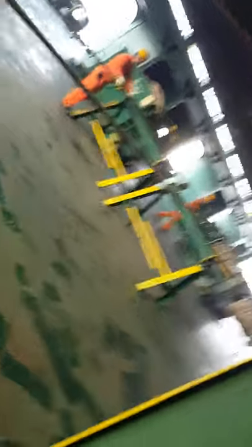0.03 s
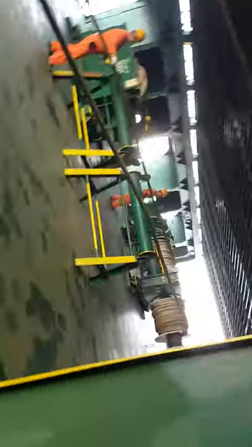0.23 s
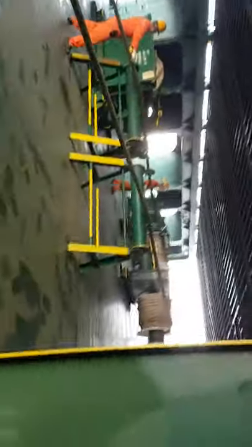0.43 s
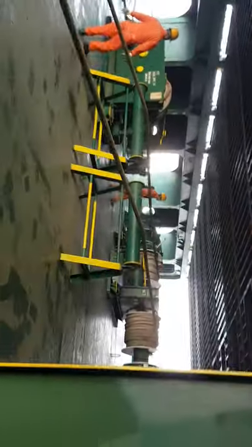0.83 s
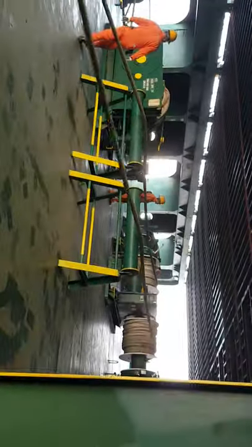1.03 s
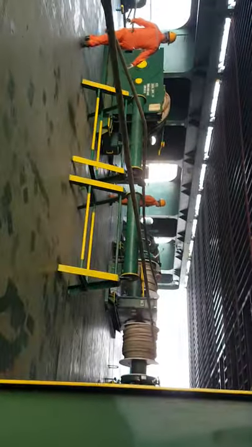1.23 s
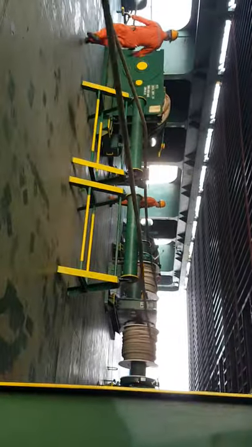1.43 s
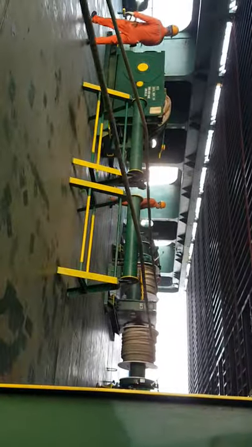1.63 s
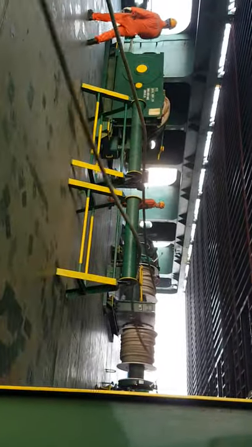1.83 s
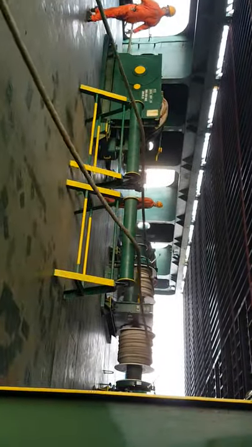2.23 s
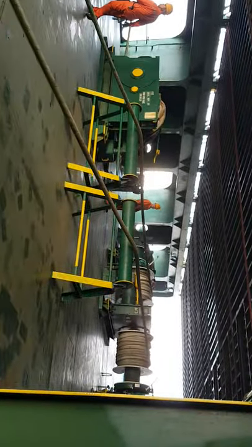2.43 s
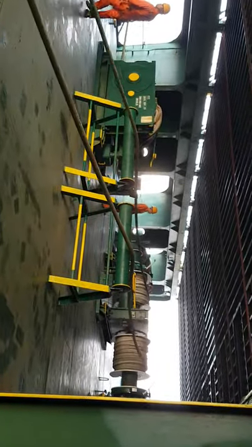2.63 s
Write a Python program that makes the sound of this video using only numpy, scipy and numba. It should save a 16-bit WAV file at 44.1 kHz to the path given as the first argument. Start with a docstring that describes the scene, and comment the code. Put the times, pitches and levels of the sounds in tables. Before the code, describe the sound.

Winch machinery drones with a wavering whine on an enclosed ship deck, picked up by a phone. Near the end a loud metallic bang distorts the microphone, followed by softer knocks and echoing, ringing steel.

```python
"""A mooring winch is running on the covered steel deck of a ship. Over a deep rumble of wind or handling the
motor hums, a gear whine swells and fades, and machinery noise washes. A few faint ticks come early. Just after
two seconds one heavy bang sets the steel plating ringing and booms round the deck. It overloads the phone,
whose gain control ducks the drone and holds it down while softer knocks set the plating ringing again."""
import sys
import numpy as np
from scipy import signal
from scipy.fft import rfft, irfft, next_fast_len
from scipy.io import wavfile
from scipy.ndimage import uniform_filter1d
from numba import njit

SR = 44100
rng = np.random.default_rng(int(sys.argv[2]) if len(sys.argv) > 2 else 0)


def int16_out(signal):
    """Quantize to a 16-bit WAV file."""
    q = np.round(np.clip(np.atleast_2d(signal).T, -1, 1) * 32767)
    wavfile.write(sys.argv[1], SR, q.astype(np.int16))


N = 123479


def undb(db):
    """Decibels to gain."""
    return 10 ** (np.asarray(db) / 20)


def pan(db):
    """Stereo gains for a left-minus-right level difference."""
    return undb(np.array([[db], [-db]]) / 2)


def at(table, hz, column=1):
    """One column of a table, read on a log-frequency axis."""
    rows = np.array(table, float)
    return np.interp(np.log(hz), np.log(rows[:, 0]), rows[:, column])


def fader(table, t):
    """Gain riding through breakpoints of t/s, level/dB."""
    return undb(np.interp(t, *np.array(table).T))


def wander(per_s):
    """Smooth random modulation with a spread near 1."""
    hold = int(SR / per_s)
    steps = np.repeat(rng.standard_normal(256)[:N // hold + 2], hold)
    return 1.3 * uniform_filter1d(uniform_filter1d(steps, hold), hold)[:N]


# stereo image of the reverberant deck: f/Hz, left-right correlation
LIKENESS = [(40, 0.95), (170, 1), (300, 0.89), (430, 0.68), (600, 0.86), (780, -0.16), (1000, 0.12),
            (1500, -0.28), (2100, -0.33), (2700, 0.29), (3500, -0.014)]
def noise_bands(spectrum):
    """Diffuse stereo noise as third-octave (Hz, band) pairs, together near rms 1."""
    size = next_fast_len(N)
    f = np.maximum(np.fft.rfftfreq(size, 1 / SR), 1)
    mid, side = rfft(rng.standard_normal((2, size)))
    like = np.clip(at(LIKENESS, f), -.99, .99)
    stereo = mid * np.sqrt((1 + like) / 2) + np.array([[1], [-1]]) * side * np.sqrt((1 - like) / 2)
    eq = undb(at(spectrum, f))
    stereo *= eq / np.sqrt(np.mean(eq ** 2))
    for hz in 20 * 2 ** (np.arange(30) / 3):
        window = np.maximum(1 - 3 * abs(np.log2(f / hz)), 0)
        yield hz, irfft(stereo * window, size)[:, :N]


def tones(partials, clock, waver_db=2, per_s=9):
    """Partials locked to one clock; echoes make each waver, the higher ones differently per side."""
    out = 0
    for hz, db in partials:
        like = np.clip(at(LIKENESS, hz), 0, 1)
        shared = np.sqrt(like) * wander(per_s)
        apart = np.sqrt(1 - like) * np.array([wander(per_s), wander(per_s)])
        gain = np.sqrt(2) * undb(db + waver_db * (shared + apart))
        phase = 2 * np.pi * (hz * clock + rng.random()) + waver_db * np.log(10) / 20 * wander(per_s)
        width = np.arccos(like) * wander(2.05) * np.array([[-1], [1]]) / 2
        out += gain * np.sin(phase + width)
    return out


# fader ride of the deep rumble: t/s, level/dB
RUMBLE_RIDE = [(0, -29.5), (.3, -35.5), (.75, -33.5), (.9, -39), (1.1, -36), (1.45, -44), (1.68, -32.5),
               (2.0, -29), (2.3, -44.5), (2.8, -43.5)]
RUMBLE_HZ = 33
def rumble(t, clock):
    """Deep, uneven rumble of wind or handling on the phone, played as one wavering sub tone."""
    return pan(-1.5) * fader(RUMBLE_RIDE, t) * tones([(RUMBLE_HZ, 0)], clock, waver_db=1.5)


# hum partials of motor and hull: f/Hz, level/dB
HUM_PARTIALS = [(41, -46), (100, -47), (120, -43), (140, -36.5), (160, -44.5), (180, -37), (215.8, -32.5),
                (270, -39), (279.8, -32), (350, -41.5), (559.8, -39), (629.7, -39)]
# fader ride of the strongest low hum: t/s, level/dB
DRONE_RIDE = [(0, -44), (.2, -42), (.38, -28), (.5, -40), (.64, -28.5), (.88, -35), (1.15, -28),
              (1.27, -34), (1.42, -29), (1.72, -45), (2.0, -31), (2.8, -31.5)]
DRONE_HZ = 80.3
def motor_hum(t, shaft):
    """The low bed: motor and hull hum over a heaving drone."""
    hum = undb(-.5) * tones(HUM_PARTIALS, shaft, waver_db=2.8)
    drone = fader(DRONE_RIDE, t) * tones([(DRONE_HZ, 0)], shaft, waver_db=1.5)
    return pan(-1.5) * (hum + drone)


# lower gear tones that come and go: f/Hz, [t/s, level/dB]
GEAR_SWELLS = [(704.5, [(0, -39.5), (.2, -37.5), (.4, -59), (.6, -45), (1.0, -50), (1.2, -43), (1.4, -41),
               (2.0, -45)]), (775.4, [(0, -50), (.5, -40.5), (1.1, -50), (1.5, -38.5), (1.75, -36),
               (2.0, -42)]), (898.5, [(0, -50), (.4, -56), (.65, -42.5), (1.1, -40), (1.7, -50),
               (2.0, -45)])]
# close, beating partials of the singing mesh: f/Hz, relative level/dB
SING_PARTIALS = [(2461, -4), (2508, -0.5), (2533, -2.5)]
# fader ride of that singing: t/s, level/dB
SING_RIDE = [(0, -50), (.32, -44), (.7, -55), (1.15, -50.5), (1.56, -45), (1.7, -46), (1.88, -47),
             (2.8, -49.5)]
# midrange partials of the gearbox: f/Hz, level/dB
GEAR_MIDS = [(737.5, -49.5), (834.4, -55), (931.3, -51), (1044, -49), (1136.4, -41.5), (1254.6, -47),
             (1405, -55.5), (1540, -60), (1766, -53.5)]
# its high partials: f/Hz, level/dB
GEAR_HIGHS = [(2121, -53), (2389, -50.5), (2654, -56.5), (2794, -57), (2929, -62), (3068, -56), (3133, -57),
              (3354, -57), (3677, -66), (3768, -68), (4156, -71), (4366, -65), (4484, -65.5)]
def gearbox(t, shaft):
    """Meshing gears sing a cluster of wavering partials, right of centre."""
    swells = sum(fader(ride, t) * tones([(hz, 0)], shaft) for hz, ride in GEAR_SWELLS)
    sing = fader(SING_RIDE, t) * tones(SING_PARTIALS, shaft)
    mids = undb(.5) * (tones(GEAR_MIDS, shaft) + swells)
    return pan(-5.5) * mids + pan(-8.5) * sing + pan(-9.5) * tones(GEAR_HIGHS, shaft)


# fader ride of the loudest gear tone: t/s, level/dB
WHINE_RIDE = [(0, -35.5), (.15, -33.5), (.28, -41.5), (.43, -30.5), (.55, -26.5), (.78, -36.5),
              (.89, -31.5), (1.21, -41.5), (1.35, -31), (1.48, -28), (1.63, -34), (1.79, -32.5),
              (1.99, -35), (2.05, -28), (2.8, -27)]
# fader ride of the upper gear tone: t/s, level/dB
UPPER_RIDE = [(0, -57), (.35, -52), (.6, -41), (.76, -54.5), (.89, -44), (1.02, -51.5), (1.15, -49),
              (1.7, -54), (1.83, -42.5), (2.0, -54), (2.8, -56.5)]
WHINE_HZ, UPPER_HZ, LEFT_LEAD_S = 1016.3, 1883.5, .00023
def gear_whine(t, shaft):
    """Two pure gear tones follow the shaft, swelling and fading."""
    main = fader(WHINE_RIDE, t) * np.sin(2 * np.pi * WHINE_HZ * np.array([shaft + LEFT_LEAD_S, shaft]))
    upper = fader(UPPER_RIDE, t) * np.sin(2 * np.pi * UPPER_HZ * shaft)
    return np.sqrt(2) * (pan(-3.5) * main + pan(-10) * upper)


# tone colour of the machinery noise: f/Hz, relative level/dB per Hz
WASH_EQ = [(15, -26.5), (32, -10.5), (52, -6), (80, 0.5), (130, 2.5), (260, -2.5), (420, -8.5), (650, -9),
           (900, -11), (1500, -17.5), (2500, -17), (3300, -23.5), (4500, -30.5), (5200, -36.5),
           (7000, -43.5), (8300, -43.5), (9400, -51), (12000, -49), (15500, -56.5)]
# panning of diffuse sound on the deck: f/Hz, left minus right/dB
DECK_PAN = [(40, -1.5), (200, 0.1), (430, -3.5), (550, 2), (800, -1.5), (1300, -4.5), (2200, -8),
            (3000, -4.5), (4000, -2), (12000, 1)]
WASH_DB, FLICKER_DB, SMOOTHER_ABOVE_HZ = -25, 1.3, 3600
THROB_HZ, THROB_DEPTH, THROB_BELOW_HZ = 20, .14, 600
def machinery_wash(t):
    """Fans and machinery: bands swell together, flicker alone; the lows throb once per shaft turn."""
    level_db = WASH_DB + .3 * wander(5.5)
    angle = 2 * np.pi * THROB_HZ * t
    throb = 1 + THROB_DEPTH * (np.sin(angle) + np.sin(2 * angle))
    out = 0
    for hz, band in noise_bands(WASH_EQ):
        flicker_db = FLICKER_DB * min(SMOOTHER_ABOVE_HZ / hz, 1) * wander(16)
        gain = undb(level_db + flicker_db) * (throb if hz < THROB_BELOW_HZ else 1)
        out += pan(at(DECK_PAN, hz)) * gain * band
    return out


# faint tick cues: t/s, level/dB
TICK_CUES = [(.19, -40), (.198, -43), (.257, -39)]
TICK_DECAY_S, TICK_ABOVE_HZ = .0006, 7000
def ticks(t):
    """Faint, very short ticks of high treble noise."""
    bursts = sum(undb(db) * (t >= s) * np.exp(-abs(t - s) / TICK_DECAY_S) for s, db in TICK_CUES)
    highpass = signal.butter(2, TICK_ABOVE_HZ, "high", fs=SR, output="sos")
    return signal.sosfilt(highpass, bursts * rng.standard_normal((2, N)))


BANG_S, BANG_ATTACK_S, LEFT_LAG_S = 2.0767, .0025, .0001
def attack(age):
    """The fast front edge of a blow."""
    return 1 - np.exp(-age / BANG_ATTACK_S)


# modes of the steel plating: f/Hz, starting level/dB, t60/s
PLATE_MODES = [(125.1, -14, 4.4), (171.3, -1, 1.15), (207.7, -6, 1.6), (281.8, -4.5, 1.9),
               (304.6, 12.5, 0.12), (336.2, -4.5, 1.4), (411.7, -6.5, 0.92), (507, -8.5, 1.9),
               (589, -13.5, 0.57), (613, -10, 1.58), (668, -13, 1.5), (732, -9, 0.94), (912.6, -11.5, 0.8)]
# further knocks that set the plating ringing again: t/s, level/dB relative to the bang
KNOCKS = [(2.1094, -12.5), (2.428, -25.5), (2.463, -22)]
def plating(t):
    """Struck steel rings at the bang and at each later knock, arriving a touch later on the left."""
    out = 0
    for start, blow_db in [(BANG_S, 0), *KNOCKS]:
        age = np.maximum(np.array([t - LEFT_LAG_S, t]) - start, 0)
        ring = sum(undb(db - 60 * age / t60) * np.sin(2 * np.pi * hz * age)
                   for hz, db, t60 in PLATE_MODES)
        out += undb(blow_db) * attack(age) * ring
    return out


# colour and tail of the deck's boom: f/Hz, relative level/dB per Hz, t60/s
BOOM_BANDS = [(25, -41.5, 1.0), (55, -20, 1.9), (91, -4, 3.9), (159, 1, 1.68), (302, 1, 2.03),
              (479, -3.5, 1.24), (755, -9, 1.28), (1130, -20.5, 1.23), (1500, -23.5, 1.45),
              (2630, -34, 0.86), (4030, -48.5, 0.56), (7000, -62, 0.52), (15000, -76.5, .3)]
BOOM_DB, BOOM_HOLD_S, BUILD_CYCLES = 3.5, .14, 1.6
def deck_boom(t):
    """Echoes gather into a dense boom, then fade; the lows build late and stay longest."""
    age = np.maximum(t - BANG_S, 0)
    fading = np.maximum(age - BOOM_HOLD_S, 0)
    out = 0
    for hz, band in noise_bands(BOOM_BANDS):
        build = 1 - np.exp(-age * hz / BUILD_CYCLES)
        tail = undb(BOOM_DB - 60 * fading / at(BOOM_BANDS, hz, column=2))
        out += pan(at(DECK_PAN, hz)) * build * tail * band
    return attack(age) * out


CRACK_DB, CRACK_BELOW_HZ, CRACK_DELAY_S, CRACK_DECAY_S = -8, 1700, .002, .017
def crack(t):
    """The bang's transient: a short burst of darkened noise."""
    age = np.maximum(t - BANG_S, 0)
    lowpass = signal.butter(2, CRACK_BELOW_HZ, fs=SR, output="sos")
    noise = signal.sosfilt(lowpass, rng.standard_normal((2, N)))
    decay = (age > CRACK_DELAY_S) * np.exp(-abs(age - CRACK_DELAY_S) / CRACK_DECAY_S)
    return undb(CRACK_DB) * attack(age) * decay * noise / noise.std()


# crackle cues as the phone overloads on the bang: t/s, level/dB
SPECKS = [(2.0831, -8.5), (2.0868, -14), (2.095, -18.5), (2.1035, -18), (2.1113, -22)]
SPECK_WIDTH_S, SPECK_BELOW_HZ = .00028, 3000
def crackle(t):
    """Sharp specks of noise crackle as the phone overloads on the front of the bang."""
    bursts = sum(undb(db) * np.exp(-abs(t - s) / SPECK_WIDTH_S) for s, db in SPECKS)
    lowpass = signal.butter(1, SPECK_BELOW_HZ, fs=SR, output="sos")
    return signal.sosfilt(lowpass, bursts * rng.standard_normal((2, N)))


@njit
def ducking(peak, threshold, attack_s, hold_s, release_s):
    """Gain control: the gain dives on peaks over the threshold, holds, then recovers."""
    gain, level, wait = np.empty(len(peak)), threshold, 0.
    for i in range(len(peak)):
        if peak[i] > level:
            level += (peak[i] - level) / (attack_s * SR)
            wait = hold_s * SR
        elif wait > 0:
            wait -= 1
        else:
            level += (threshold - level) / (release_s * SR)
        gain[i] = threshold / level
    return gain


def scene():
    """The mix: rumble, the winch on one nearly steady shaft, the wash, faint ticks, then the bang."""
    t = np.arange(N) / SR
    clock = t + .001 * np.cumsum(wander(3.046)) / SR  # pitch drifts about 0.1 %
    bed = rumble(t, clock) + motor_hum(t, clock) + gearbox(t, clock) + gear_whine(t, clock)
    bed += machinery_wash(t)
    bang = deck_boom(t) + pan(-2.5) * (plating(t) + crack(t))
    return bed + ticks(t) + bang + crackle(t)


FADE_DB, FADE_S, LOOKAHEAD_S = -11, .2, .0088
CLIP_LEVEL, CLIP_KNEE, HISS_DB, TOP_HZ = .94, 24, -82.5, 15750
def record(dry):
    """The phone fades in, ducks just ahead of an overload, clips, hisses faintly and cuts the top."""
    t = np.arange(N) / SR
    x = dry * undb(FADE_DB * np.maximum(1 - t / FADE_S, 0))
    coming_peak = np.interp(t + LOOKAHEAD_S, t, abs(x).max(axis=0))
    x *= ducking(coming_peak, threshold=.55, attack_s=.01, hold_s=.66, release_s=.1)
    x /= (1 + abs(x / CLIP_LEVEL) ** CLIP_KNEE) ** (1 / CLIP_KNEE)
    x += undb(HISS_DB) * rng.standard_normal((2, N))
    return signal.sosfilt(signal.ellip(10, .1, 80, TOP_HZ, fs=SR, output="sos"), x)


dry = scene()
out = record(dry)
int16_out(out)
```